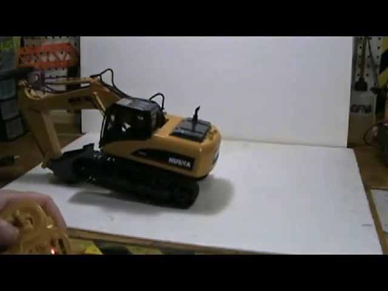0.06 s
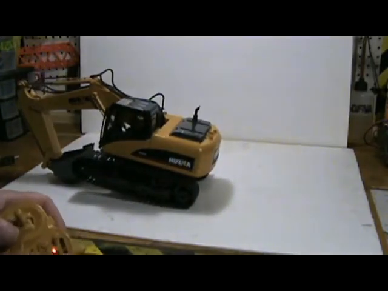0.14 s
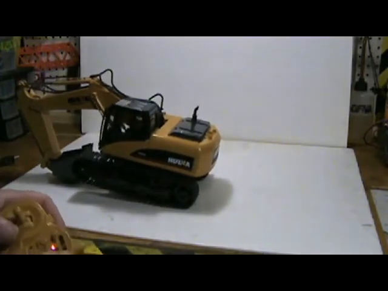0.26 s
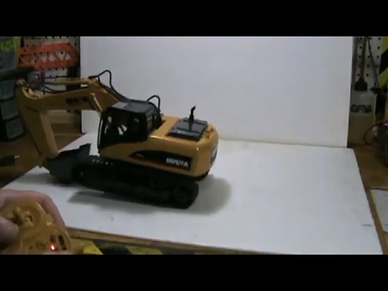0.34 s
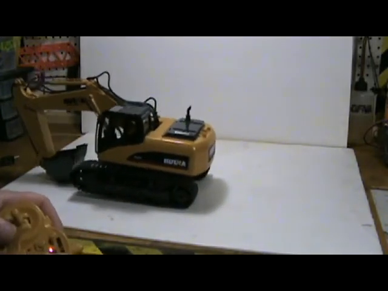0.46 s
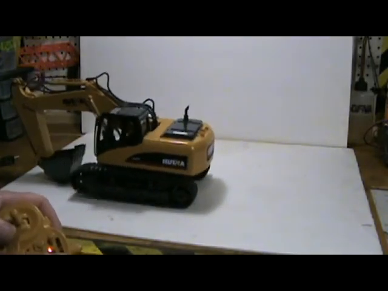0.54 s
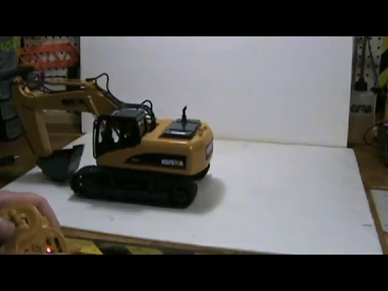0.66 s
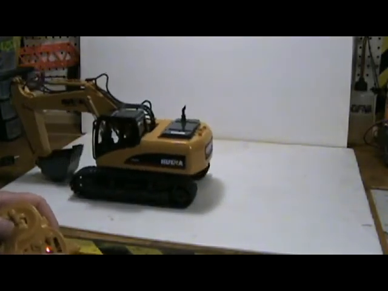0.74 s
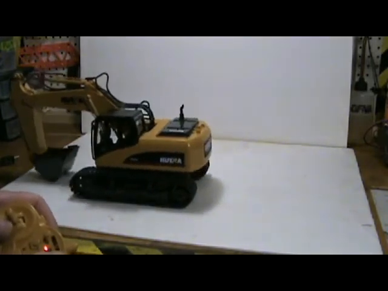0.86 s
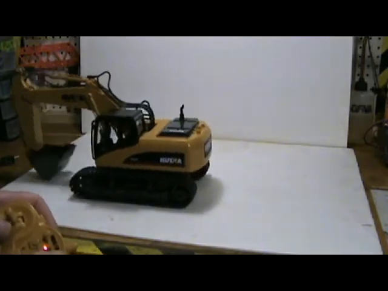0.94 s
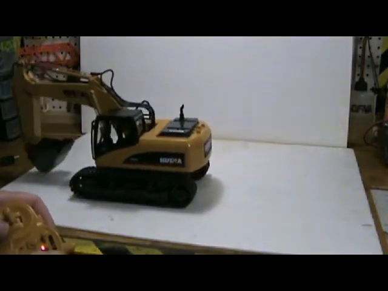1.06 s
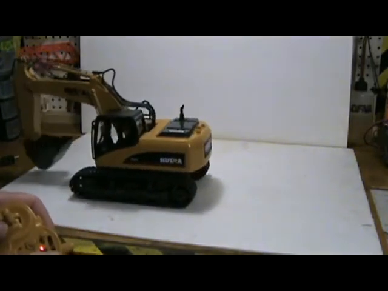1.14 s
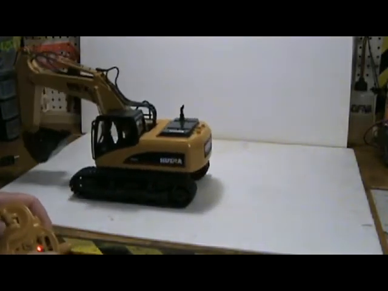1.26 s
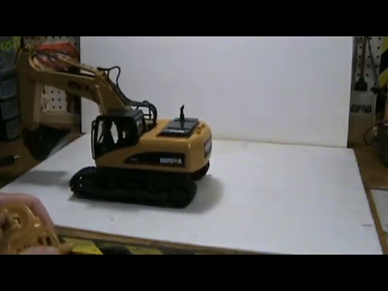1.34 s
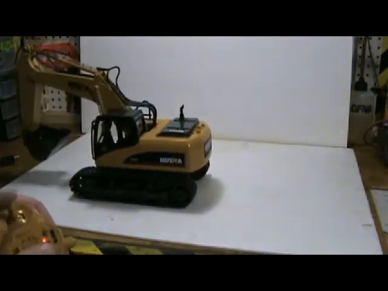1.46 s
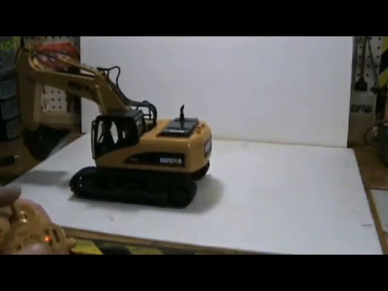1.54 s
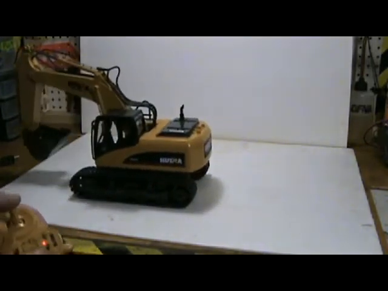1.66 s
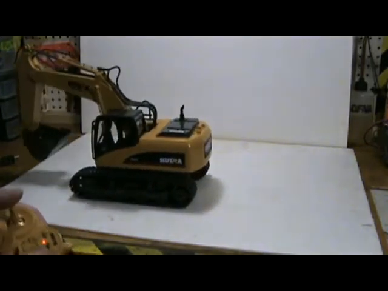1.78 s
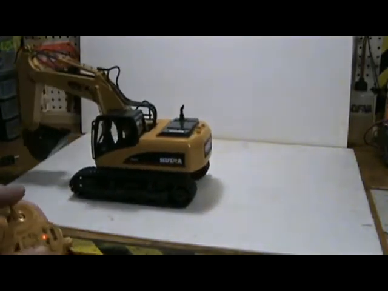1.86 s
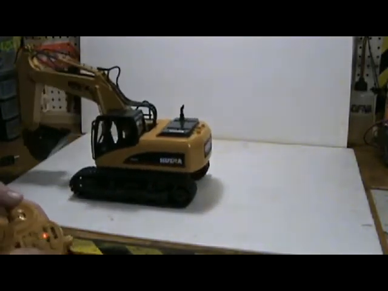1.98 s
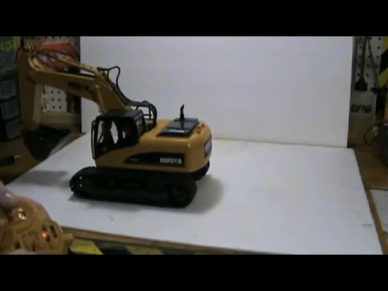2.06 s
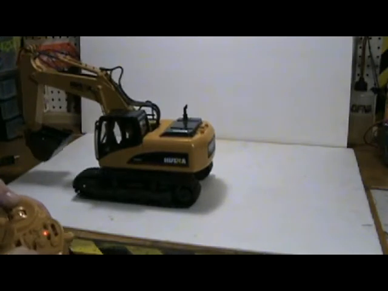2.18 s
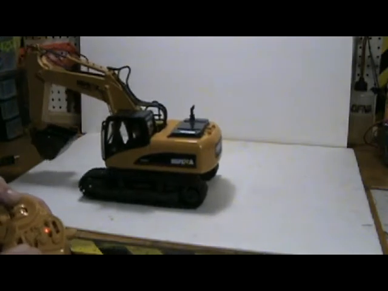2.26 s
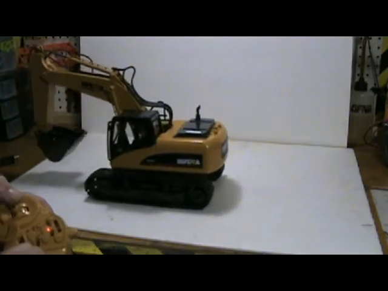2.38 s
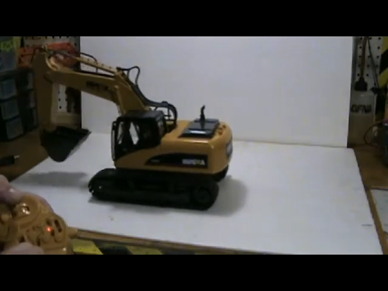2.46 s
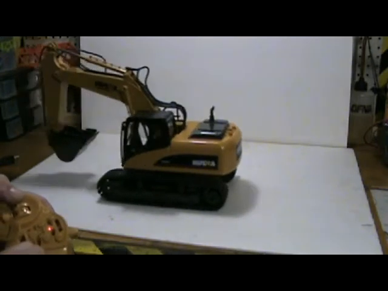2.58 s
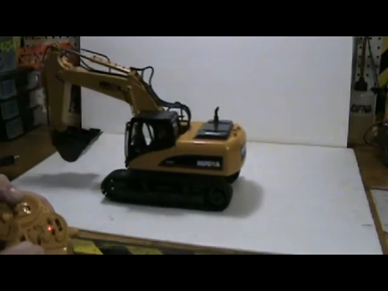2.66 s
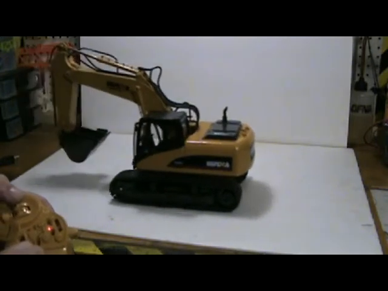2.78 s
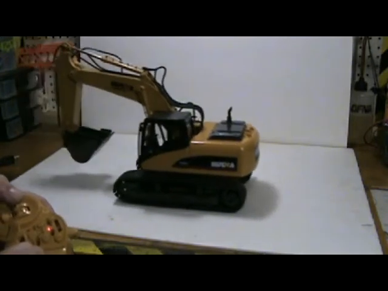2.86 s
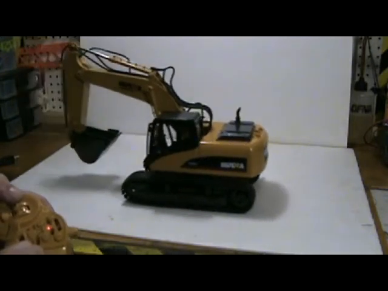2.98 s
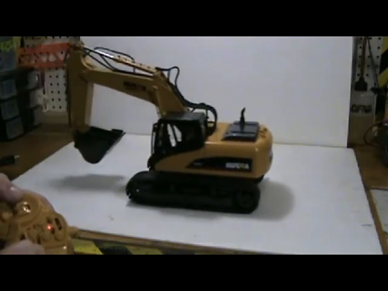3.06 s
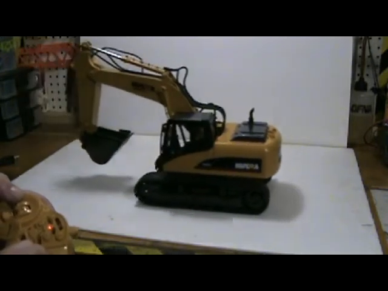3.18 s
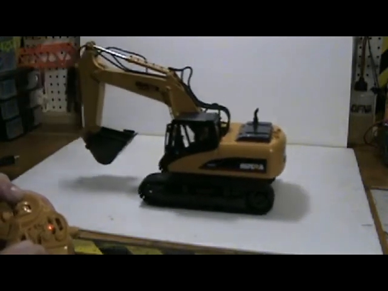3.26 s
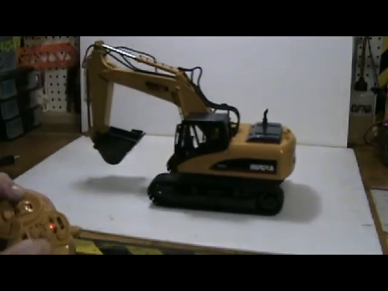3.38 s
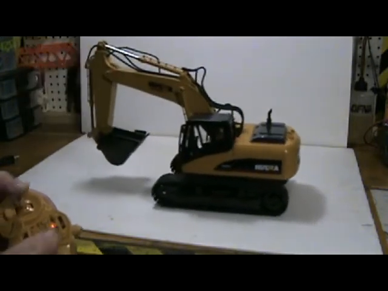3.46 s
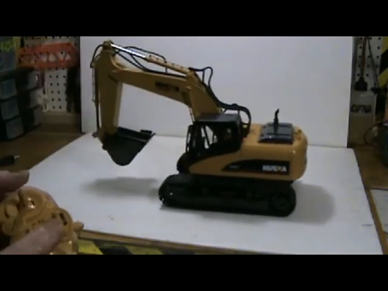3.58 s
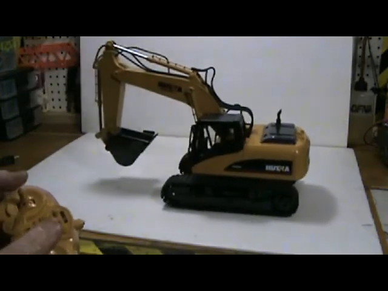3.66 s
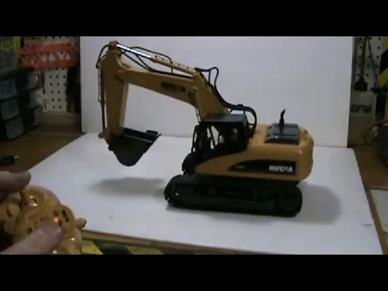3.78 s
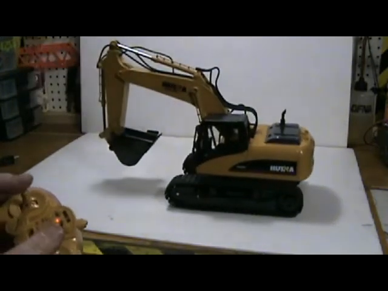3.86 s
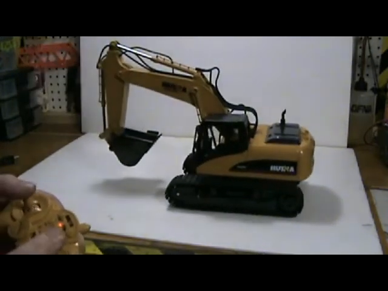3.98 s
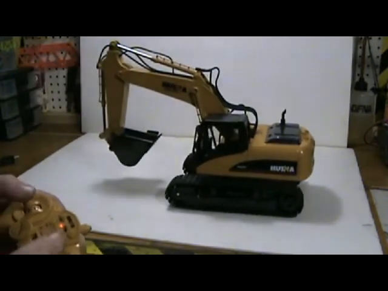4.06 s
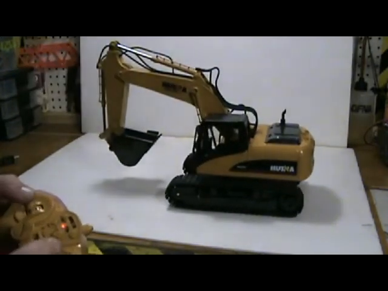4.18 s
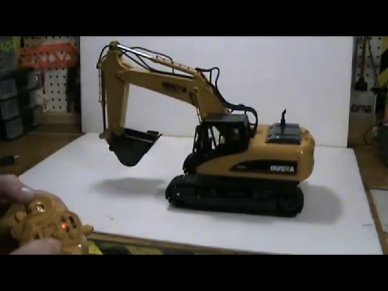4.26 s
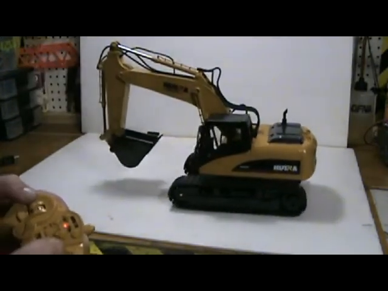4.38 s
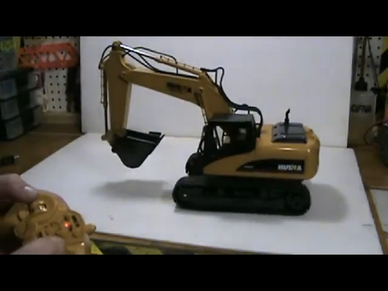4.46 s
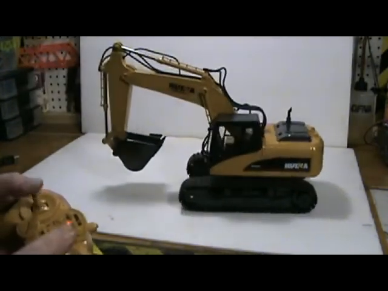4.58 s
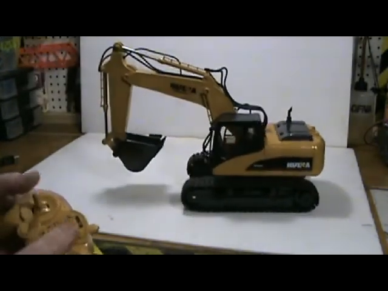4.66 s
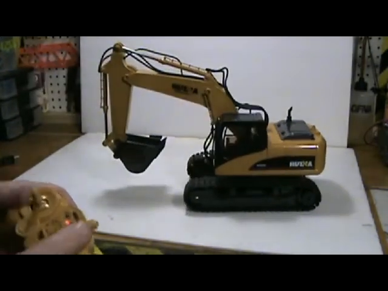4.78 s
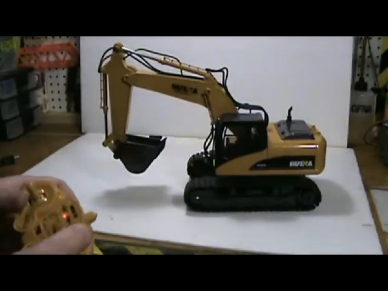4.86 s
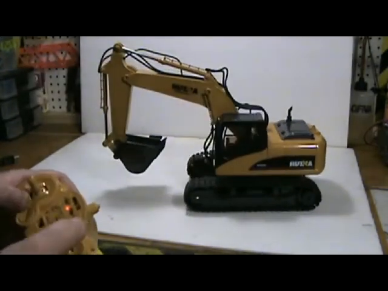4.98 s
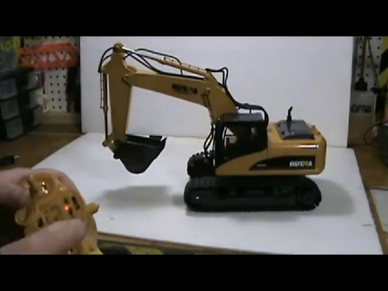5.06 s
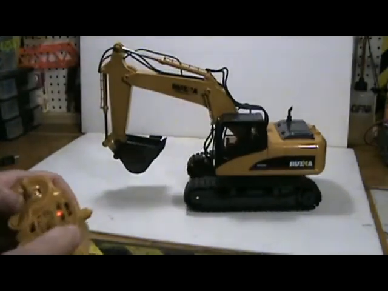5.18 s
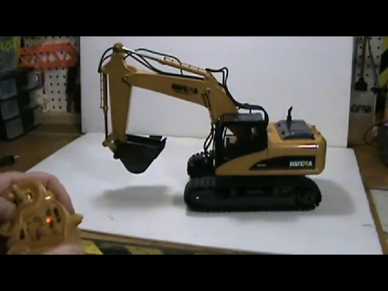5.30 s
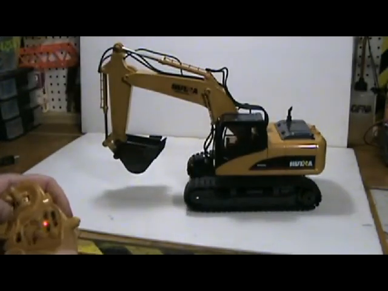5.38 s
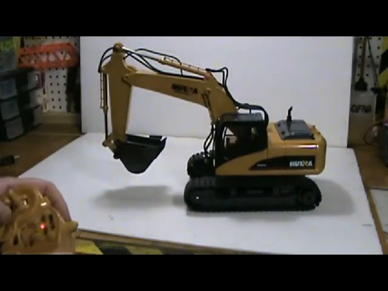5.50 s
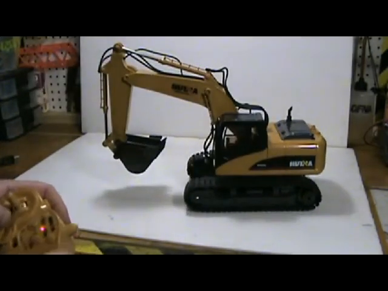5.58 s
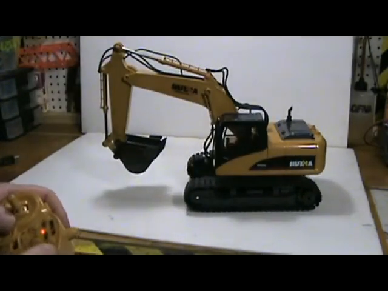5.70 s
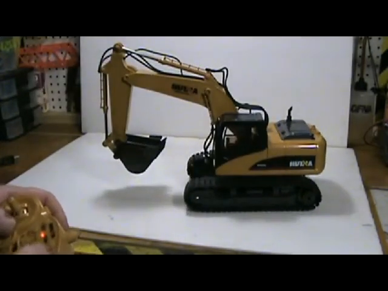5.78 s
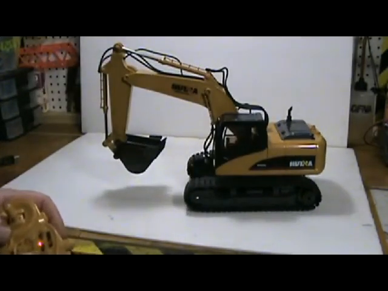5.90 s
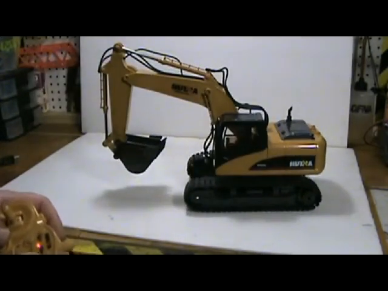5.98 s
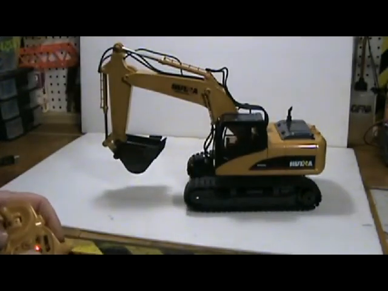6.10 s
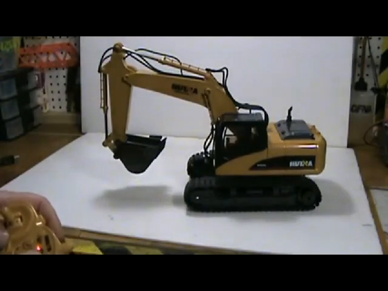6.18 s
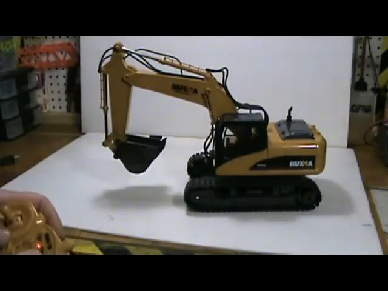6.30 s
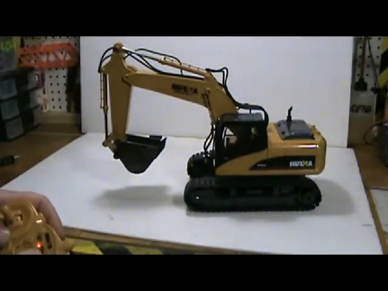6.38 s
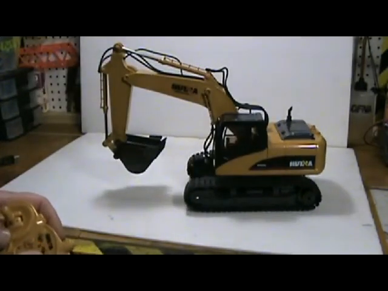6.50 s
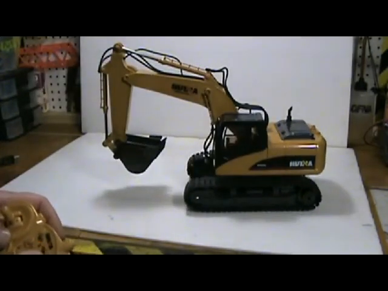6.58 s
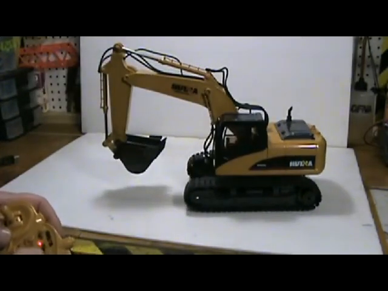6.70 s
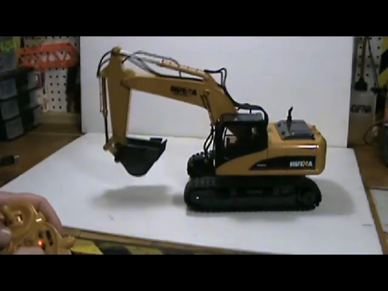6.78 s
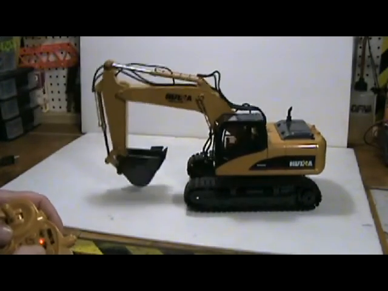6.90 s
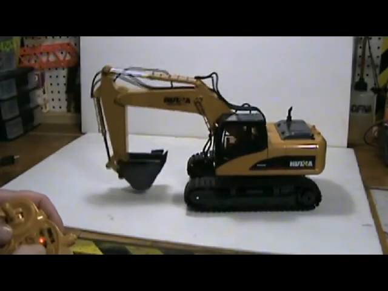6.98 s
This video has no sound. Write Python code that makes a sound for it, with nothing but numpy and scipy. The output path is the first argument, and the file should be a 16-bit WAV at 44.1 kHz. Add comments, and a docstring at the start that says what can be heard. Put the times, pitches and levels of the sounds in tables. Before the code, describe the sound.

Close in a small, fairly dry room, a toy excavator's boom motor whines thinly, then sags to a lower, rougher grind and stops with a crack. After small plastic clicks, louder twin track motors whir with a gritty beating buzz and coast down. A sharp click and brief drive nudge follow, then sparse clicks and a final boom whine. Faint hum and hiss stay underneath.

```python
"""Toy excavator on a tabletop

A radio-controlled toy excavator works in a small room with a faint hum. Its boom motor runs light, then slows
under the weight of the arm; the track motors drive it back and nudge it once more, and the boom starts down.
Motors are sums of shaft harmonics, periodic buzz and gear noise that follow a speed curve; clicks, cracks and
rasps are shaped noise bursts, and bumps are decaying modes of the table."""
import sys
import numpy as np
from scipy import signal
from scipy.fft import rfft, irfft
from scipy.io import wavfile
from scipy.ndimage import uniform_filter1d

SR = 44100
rng = np.random.default_rng(int(sys.argv[2]) if len(sys.argv) > 2 else 0)


def pcm_store(signal):
    """Save signal as 16-bit PCM."""
    levels = np.round(np.clip(np.atleast_2d(signal), -1, 1) * 32767)
    wavfile.write(sys.argv[1], SR, levels.astype(np.int16).T)


N = 310464
T = np.arange(N) / SR
HZ = np.fft.rfftfreq(N, 1 / SR)
EDGE_HZ = 15850  # upper limit of the sound


def amp(db):
    """Level law: decibels to amplitude gain."""
    return 10 ** (np.asarray(db) / 20)


def unit(x):
    """Normalisation of a signal to rms 1."""
    return x / np.sqrt(np.mean(x ** 2) + 1e-20)


def read(points, hz):
    """Linear interpolation of a table on a log-frequency axis."""
    f, value = np.transpose(points)
    return np.interp(np.log(hz + 1), np.log(f + 1), value)


def coloured(x, spectrum):
    """Linear filtering: weights a steady sound by a spectrum in dB, at rms 1."""
    return unit(irfft(rfft(x) * amp(read(spectrum, HZ)), N))


def resonate(x, hz, width):
    """Resonance: a bell-shaped gain with half width in Hz acts on a steady sound, at rms 1."""
    return unit(irfft(rfft(x) / (1 + ((HZ - hz) / width) ** 2), N))


def noise_band(hz, width):
    """Resonance excited by white noise, at rms 1."""
    return resonate(rng.standard_normal(N), hz, width)


def drift(rate):
    """Low-pass random process of rms 1 that moves up to about rate times a second."""
    lowpass = (HZ > 0) / (1 + (HZ / rate) ** 4)
    return unit(irfft(rfft(rng.standard_normal(N)) * lowpass, N))


def wander(rate, t):
    """Piecewise-linear random process: chance values, rate times a second, joined at the times t."""
    knots = np.arange(-1, T[-1] * rate + 1)
    return np.interp(t * rate, knots + rng.random(), rng.standard_normal(len(knots)))


def sway(crest_s, period_s, depth):
    """Periodic modulation: the rise and fall that an uneven gear makes on every turn."""
    return depth * np.cos(2 * np.pi * (T - crest_s) / period_s)


def add(mix, s, sound):
    """Superposition: adds a sound into the mix at time s."""
    part = mix[round(s * SR):][:len(sound)]
    part += sound[:len(part)]


def shaft(run, top_hz):
    """Rotor inertia and drag: exponential spin-up, then coasting to rest; gives (speed, level, gate)."""
    on_s, off_s, coast_s, spin_s, rise, fall, db = run
    spin = 1 - np.exp(-np.maximum(T - on_s, 0) / spin_s)
    coast = np.clip(1 - (T - off_s) / coast_s, 0, 1)
    gate = np.clip(np.minimum(T - on_s, off_s + coast_s - T) / .025, 0, 1)
    # at switch-off the gears clatter briefly as they go slack
    clatter_db = 1.5 * np.exp(-((T - off_s) / 0.03) ** 2)
    level = gate * amp(db + clatter_db) * spin ** rise * coast ** fall
    # drag slows the shaft quickly at first
    return top_hz * spin * coast ** 1.4, level, gate


def motor(run, full_hz, lines, grind, can, rough, lines_db, buzz_db, grind_db, brush_db, rattle_db, wobble,
          flutter=3, slack_db=-21):
    """Gear-mesh harmonics locked to the shaft angle, with periodic buzz, scraping, backlash and brush noise."""
    # Gear lines that come forward while a motor spins up or coasts.
    # Each row: multiple of the shaft speed, relative level in dB.
    slack_lines = [(3, 0), (5, -5), (11, -8)]
    hz, level, gate = run
    pace = np.clip(hz / full_hz, 0, 1)
    # below working speed the shaft jerks more
    jerk = .4 * wobble + 0.045 * (1 - pace)
    angle = 2 * np.pi * np.cumsum(hz * (1 + wobble * drift(18) + jerk * drift(120))) / SR
    on = gate > 0
    whine, buzz, slack = np.zeros((3, N))

    # each line swells and sinks with the uneven teeth, the lowest least; they sing only near working speed
    shake = rough + .8 * (1 - pace[on])
    for order, db in lines:
        swell = unit(amp(flutter * order / (order + 1) * wander(28, T[on])))
        slip = shake * wander(130, T[on])
        strength = amp(db) * swell * pace[on] ** (1 + order / 2)
        phase = round(order) * angle[on] + slip + 2 * np.pi * rng.random()
        whine[on] += np.sqrt(2) * strength * np.cos(phase)

    # small flaws pass once a turn and fill in the weaker multiples, which come and go as the mesh shifts
    turn = angle[on] / (2 * np.pi) % 1
    for _ in range(3):
        harmonics = np.exp(2j * np.pi * rng.random(128))[:int(EDGE_HZ / full_hz)]
        cycle = irfft(harmonics, 2048)
        cycle -= cycle.mean()
        buzz[on] += wander(14, T[on]) * np.interp(turn, np.linspace(0, 1, len(cycle)), cycle)
    buzz[on] /= np.sqrt(uniform_filter1d(buzz[on] ** 2, SR // 50) + 1e-12)  # evens out the level
    duty = np.sqrt(on.mean())  # undoes the gain that rms scaling gives a short run

    # teeth scrape harder on one part of each turn, and catch at random
    catch = amp(2.3 * drift(250) + 1.6 * drift(25))
    scrape = unit((1 + 0.2 * np.cos(angle) + 0.18 * np.cos(2 * angle)) * catch)
    grit = on * scrape * rng.standard_normal(N)
    shell = amp(buzz_db) * coloured(buzz, grind) + amp(grind_db) * coloured(grit, grind)

    # below working speed the slack gears chatter into the low resonance of the gearbox
    rattle = (1 - pace) ** 0.42 * resonate(.8 * buzz + grit, 820, 240)

    # gliding lines of the armature and the slack gears, strongest at three quarters of working speed
    for order, db in slack_lines:
        strength = amp(db + 4 * wander(50, T[on]))
        slack[on] += strength * np.cos(order * angle[on] + rough * wander(130, T[on]))
    slack *= 10 * pace ** 3 * (1 - pace)
    gears = amp(lines_db) * whine + amp(slack_db) * slack + duty * (shell + amp(rattle_db) * rattle)

    # the brushes ring the motor can for as long as the shaft turns
    brushes = duty * sum(resonate(buzz + grit, can_hz, width) for can_hz, width in can)
    return level * gears + amp(brush_db) * gate * pace ** 0.42 * brushes


def tracks(lag=0.007):
    """Beating of two nearly equal motors, coloured by chassis modes, with tread rumble on the table."""
    # Motor runs. Each: switched on in seconds, switched off in seconds, coasting time in seconds, spin-up
    # time constant in seconds, power by which loudness follows speed spinning up, the same coasting,
    # base level at full speed in dB.
    drive, drive_other, nudge_run = (2.08, 3.468, 0.512, 0.062, 1.2, 1.28, -21.5), (2.088, 3.405, 0.55, 0.07, 1.2, 1.1, -22), (4.304, 4.518, 0.378, 0.05, 1.1,
                                                                         1.45, -26.8)
    # Cruising speed as the tread drags and frees. Each row: time in seconds, turns per second.
    cruise_points = [(2.36, 386), (2.41, 387), (2.51, 381.5), (2.6, 385.5), (2.91, 384), (3.066, 376),
                     (3.142, 385.5), (3.235, 380), (3.3, 386.5)]
    # Gear and commutator lines. Each row: multiple of the shaft speed, relative level in dB.
    drive_lines, nudge_lines = [(1, -19.5), (2, -24), (3, -23.5), (5, -20), (6, -20.5), (7, -23), (8, -20),
                                (9, -20), (10, -22), (11, -21), (13, -20), (14, -19), (15, -18.5),
                                (16, -17), (17, -15.5), (18, -14)], [(1, -22), (2, -18.5), (3, -13), (5, -13.5), (7, -15.5),
                                                     (8, -17), (11, -11), (16, -16.5)]
    # Grinding as the plastic shell radiates it. Each row: frequency in Hz, relative dB per Hz.
    grind = [(40, -24), (100, -13), (500, -19), (700, -10), (1600, -2.5), (3500, -1), (4500, -6),
             (8300, -6), (10300, -17), (15300, -22)]
    # Resonance of the motor can, rung by the brushes. Each row: frequency in Hz, half width in Hz.
    can = [(8650, 700)]
    # Undercarriage modes that gliding lines excite. Each row: frequency in Hz, lift in dB.
    chassis_modes = [(775, 4.5), (1450, 6.5), (2200, 5), (2830, 4), (3840, 3.5), (4985, 7), (5650, 4)]
    wobble, flutter = .0035, 5.3  # share of the speed; swell of the lines in dB
    rough_drive, rough_nudge = .42, .66  # radians by which uneven teeth shake the lines out of step

    cruise = np.interp(T, *np.transpose(cruise_points))
    driving = shaft(drive, cruise)
    following = shaft(drive_other, cruise * (1 - lag))
    nudging = shaft(nudge_run, 372)
    lead = motor(driving, 375, drive_lines, grind, can, rough_drive, lines_db=-0.5, buzz_db=-12,
                 grind_db=-7.8, brush_db=-49, rattle_db=-20, wobble=wobble, flutter=flutter, slack_db=-15.5)
    follower = motor(following, 380, drive_lines, grind, can, rough_drive, lines_db=-2.5, buzz_db=-11.5,
                     grind_db=-10, brush_db=-53, rattle_db=-24, wobble=wobble, flutter=flutter, slack_db=-25)
    nudge = motor(nudging, 356, nudge_lines, grind, can, rough_nudge, lines_db=1.5, buzz_db=-9,
                  grind_db=-6.5, brush_db=-44, rattle_db=-18, wobble=2 * wobble, flutter=flutter,
                  slack_db=-13.5)
    chassis_db = sum(db / (1 + ((HZ - hz) / 90) ** 2) for hz, db in chassis_modes)
    rumble = (driving[1] + nudging[1]) ** 0.7 * amp(-43 + 2 * drift(6)) * noise_band(95, 65)
    return irfft(rfft(lead + follower + nudge) * amp(chassis_db), N) + rumble


def boom():
    """Load on a motor: torque slows the shaft and changes its spectrum; later the motor lowers the arm."""
    # Motor runs. Each: switched on in seconds, switched off in seconds, coasting time in seconds, spin-up
    # time constant in seconds, power by which loudness follows speed spinning up, the same coasting,
    # base level at full speed in dB.
    boom_up, boom_down = (0.226, 1.326, 0.075, 0.026, 0.6, 1.6, -33.1), (6.726, 7.1, 0.058, 0.027, 2.1, 1.4, -32.7)
    # The weight of the arm comes onto the gears: from and until, in seconds.
    load_from, load_until = (0.75, 0.955)
    # Uneven turning of the gear. Each: time of a crest in seconds, period in seconds, depth: lifting in
    # turns per second; lowering in turns per second and also in dB.
    lift_sway, lower_sway = (1.068, 0.222, 4.2), (6.83, 0.17, 2.1)
    # Gear and commutator lines. Each row: multiple of the shaft speed, relative level in dB.
    light_lines, loaded_lines, down_lines = [(1, -18.5), (3, -10), (5, -6.5), (6, -10), (9, -10.5),
                                             (30, -11), (36, -9), (37, -4), (38, -9)], [(6, -20), (9, -13), (12, -12.5),
                                                                  (13, -11), (16, -14), (18, -9), (19, -12)], [(1, -24), (3, -18),
                                                                                        (4, -9), (6, -16),
                                                                                        (10, -8.5),
                                                                                        (12, -11),
                                                                                        (15, -10.5),
                                                                                        (16, -9.5),
                                                                                        (19, -16),
                                                                                        (36, -15)]
    # Grinding as the plastic shell radiates it. Each row: frequency in Hz, relative dB per Hz.
    light_grind, loaded_grind, down_grind = [(150, -24), (450, -6.5), (950, 4), (1600, -2), (2900, -3.5),
                                             (5500, -7), (6550, -5), (7900, -8), (9600, -12), (15500, -23)], [(150, -17.5), (1000, -13), (1900, 0.5),
                                                                  (2900, 0.5), (5400, -10), (6550, -7),
                                                                  (8200, -13.5), (10300, -14), (15500, -22)], [(150, -27),
                                                                                        (680, -3),
                                                                                        (1600, -6),
                                                                                        (2200, 1),
                                                                                        (5400, -8.5),
                                                                                        (6700, -3),
                                                                                        (8200, -17),
                                                                                        (10500, -14.5),
                                                                                        (15500, -27)]
    # Resonances of the motor can, rung by the brushes. Each row: frequency in Hz, half width in Hz.
    can = [(6550, 100), (8080, 260)]
    up_hz, down_hz, load_sag_hz = 212, 206.3, 56.5  # free speeds and loss under load, turns per second
    rough_light, rough_loaded = .24, .48  # radians by which uneven teeth shake the lines out of step

    load = np.clip((T - load_from) / (load_until - load_from), 0, 1)
    sag_hz = np.sin(np.pi / 2 * load) ** 2 * (load_sag_hz - sway(*lift_sway))
    # the teeth grind while they take up the load
    strain_db = 9 * np.sin(np.pi * np.sqrt(load)) ** 2
    lowering_sway = sway(*lower_sway)
    lifting = shaft(boom_up, up_hz - sag_hz)
    lowering = shaft(boom_down, down_hz + lowering_sway)
    light = motor(lifting, 201, light_lines, light_grind, can, rough_light, lines_db=-3, buzz_db=-6.5,
                  grind_db=-4.5, brush_db=-53, rattle_db=-5.0, wobble=0.00157)
    loaded = motor(lifting, 152, loaded_lines, loaded_grind, can, rough_loaded, lines_db=-2.5,
                   buzz_db=strain_db - 3.5, grind_db=strain_db - 7.5, brush_db=-46.5, rattle_db=-6.5,
                   wobble=0.0033, flutter=4.5)
    down = motor(lowering, 197, down_lines, down_grind, can, rough_light, lines_db=0.5, buzz_db=-3,
                 grind_db=-8.5, brush_db=-53.5, rattle_db=-2, wobble=0.0015)
    return (1 - load) * light + np.sqrt(load) * amp(-2.2) * loaded + amp(lowering_sway) * down


def rasps(stutter_hz=170, stutter_db=4.5, width_hz=420):
    """Amplitude-modulated noise in a resonance: slack teeth stutter and swell briefly in the gearbox."""
    # Rasps as a motor starts, runs light, takes up its load or stops.
    # Each row: time of the crest in seconds, length in seconds, level in dB, centre frequency in Hz.
    rasp_rows = [(0.295, 0.055, -41, 620), (0.39, 0.06, -43, 900), (0.54, 0.035, -42, 2800),
                 (0.785, 0.045, -38.5, 4950), (3.465, 0.025, -34, 900), (3.53, 0.06, -30, 5300),
                 (3.53, 0.04, -33, 3550)]
    out, t = np.zeros(N), np.arange(SR // 4) / SR
    for s, length, db, hz in rasp_rows:
        tone = 1 / (1 + ((np.fft.rfftfreq(len(t), 1 / SR) - hz) / width_hz) ** 2) ** 2
        teeth = rng.standard_normal(len(t)) * amp(stutter_db * wander(stutter_hz, t))
        swell = np.exp(-2 * ((t - t.mean()) / length) ** 2)
        add(out, s - t.mean(), amp(db) * swell * unit(irfft(rfft(teeth) * tone, len(t))))
    return out


def skips(crack_s=0.003):
    """Impulsive excitation: a skipping tooth of the loaded boom gear gives a short bright crack."""
    # Each row: start in seconds, level in dB.
    skip_rows = [(0.887, -22.5), (1.336, -24.5)]
    cracks = sum(amp(db) * (T >= s) * np.exp(-abs(T - s) / crack_s) for s, db in skip_rows)
    return noise_band(6800, 3000) * cracks


def clicks(snap_s=0.0024, ring_s=0.017, ring_db=-12, gain_db=-3.9, note_db=9, note_octaves=0.55,
           dull_hz=9000, dull_db=-32.5):
    """Impact and free decay: a hard snap, then the ring of a plastic part; soft impacts are duller."""
    # Sharp plastic clicks of the levers and the shell.
    # Each row: start in seconds, level in dB before the common gain, note of the part that snaps in Hz.
    click_rows = [(0.065, -39, 2000), (0.184, -18, 3300), (1.529, -29, 751), (1.611, -38, 2980),
                  (1.65, -31, 773), (1.7, -39, 1200), (1.75, -39, 921), (1.779, -35, 684),
                  (1.843, -34, 770), (1.916, -32, 1230), (2.06, -21.5, 982), (4.072, -37.5, 678),
                  (4.27, -36, 764), (4.604, -11.5, 2500), (4.996, -31, 1960), (5.139, -27, 958),
                  (5.217, -30, 2240), (5.609, -40, 3160), (5.769, -38.5, 4000), (5.801, -35, 2310),
                  (6.675, -19, 3440)]
    # Spectrum common to all clicks. Each row: frequency in Hz, relative dB per Hz.
    colour = [(250, -22), (750, 3.5), (1600, -2), (3200, -1), (8000, -9), (15800, -32)]
    out, t, hz = np.zeros(N), np.arange(4096) / SR, np.fft.rfftfreq(4096, 1 / SR)
    decay = np.exp(-t / snap_s) + amp(ring_db) * np.exp(-t / ring_s)
    fall = decay * (1 - np.exp(-t / 0.00072))
    for s, db, note_hz in click_rows:
        octaves_off = np.log2((hz + 1) / note_hz)
        colour_db = read(colour, hz) + note_db / (1 + (octaves_off / note_octaves) ** 2)
        softness = 1 / (1 + (hz / dull_hz) ** 2 * amp(dull_db - db) / 2)
        shell = unit(irfft(rfft(rng.standard_normal(len(t))) * amp(colour_db) * softness))
        add(out, s, amp(db + gain_db) * fall * shell)
    return out


def bumps(gain_db=-6, bounce_s=0.024, bounce_db=-4):
    """Modal response: the chassis drops and bounces once, and the tabletop answers with its low modes."""
    # Each row: start in seconds, level in dB before the common gain.
    bump_rows = [(0.686, -30), (2.284, -32), (2.944, -23), (3.022, -21), (3.652, -21), (4.388, -29)]
    # Each row: nominal frequency in Hz, relative level in dB, time to decay by 60 dB in seconds.
    table_modes = [(102, -8, 0.16), (192.7, -3, 0.11), (289, 2, 0.072), (517, -5, 0.066)]
    out, t = np.zeros(N), np.arange(SR // 4) / SR
    for s, db in bump_rows:
        for delay, blow_db in [(0, 0), (bounce_s, bounce_db)]:
            ring = np.zeros(len(t))
            for hz, mode_db, t60 in table_modes:
                phase = 2 * np.pi * (hz * rng.uniform(.93, 1.07) * t + rng.random())
                ring += amp(mode_db - 60 * t / t60) * np.sin(phase)
            add(out, s + delay, amp(db + blow_db + gain_db) * ring * (1 - np.exp(-t / 0.0027)))
    return out


def room(x, t60=0.16, wet_db=-12.5):
    """Reverberation: a short decaying tail of sparse reflections, different at each microphone port."""
    t = np.arange(SR // 3) / SR
    sparse = rng.random((2, len(t))) < 3000 / SR  # reflections per second
    taps = rng.standard_normal((2, len(t))) * sparse * (t > .002) * amp(-60 * t / t60)
    taps = signal.lfilter([1], [1, -0.25], taps)  # the walls soak up the treble
    taps /= np.linalg.norm(taps, axis=1, keepdims=True)
    return x + amp(wet_db) * signal.fftconvolve(x[None], taps, axes=1)[:, :N]


def background(air_db=-62, hum_db=1.3, apart_db=-13):
    """Tones with slow level and phase modulation over partly correlated noise: hum and room hiss."""
    # Each row: frequency in Hz, rms level in dB before the common hum gain.
    hum_lines = [(333.8, -69), (446.8, -65), (839.8, -71)]
    # Spectrum of the hiss. Each row: frequency in Hz, relative dB per Hz.
    air = [(30, -9), (120, -4.5), (380, -5), (620, -6.5), (1100, -8), (3000, -13.5), (15500, -25.5)]
    hum = np.zeros(N)
    for hz, db in hum_lines:
        strength = np.sqrt(2) * amp(db + hum_db + 1.3 * drift(7))
        hum += strength * np.sin(2 * np.pi * hz * T + 0.64 * drift(6))
    shared, left, right = (coloured(rng.standard_normal(N), air) for _ in range(3))
    return hum + amp(air_db) * (shared + amp(apart_db) * np.array([left, right]))


def scene():
    """Superposition of the toy and its control in the room, over the hum and hiss."""
    return room(tracks() + boom() + rasps() + skips() + clicks() + bumps()) + background()


def record(dry):
    """Interchannel phase and level differences of two microphone ports, then a low-pass band limit."""
    # Each row: frequency in Hz, phase by which left leads in radians.
    port_phase = [(0, 0), (340, -0.55), (860, -0.85), (1890, -0.55), (6030, -0.24), (15500, 0.0)]
    # Each row: frequency in Hz, level of left minus right in dB.
    port_balance = [(100, -2), (300, -3.1), (700, -0.2)]
    # each port takes half of the difference
    half = np.exp(.5j * read(port_phase, HZ)) * amp(read(port_balance, HZ) / 2)
    ports = irfft(rfft(dry) * np.array([half, 1 / half]), N)
    lowpass = signal.firwin(511, EDGE_HZ, window=("kaiser", 9), fs=SR)
    return signal.oaconvolve(ports, lowpass[None], "same")


dry = scene()
out = record(dry)
pcm_store(out)
```